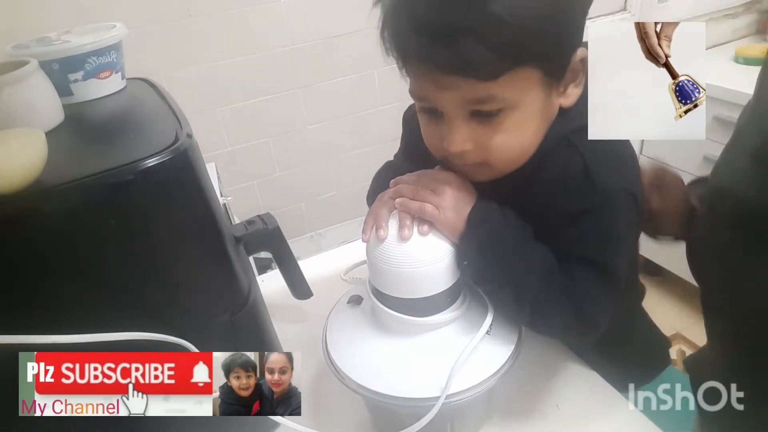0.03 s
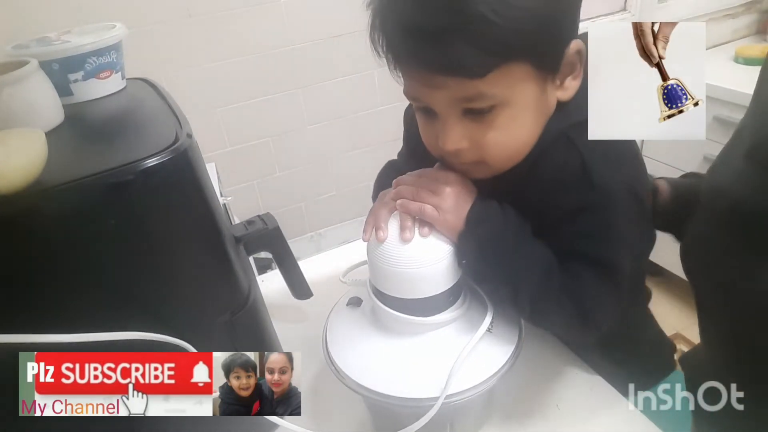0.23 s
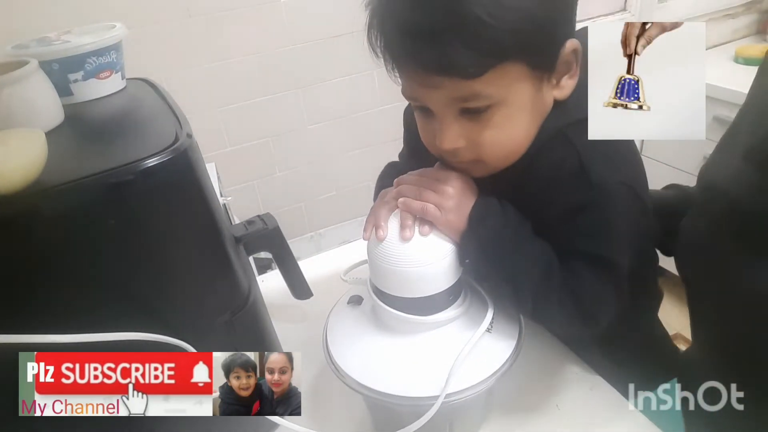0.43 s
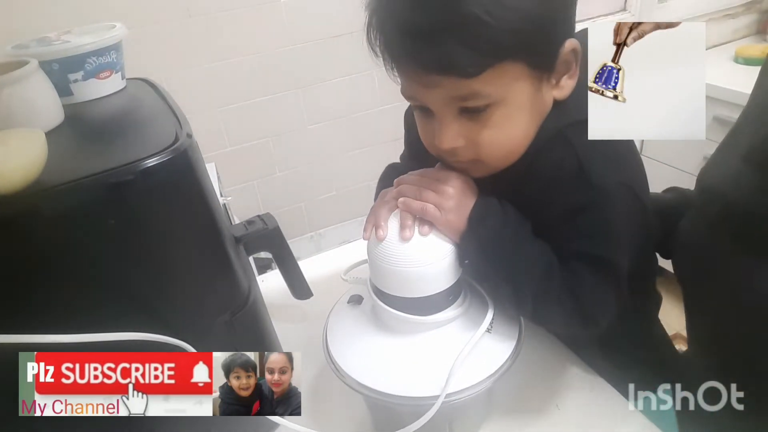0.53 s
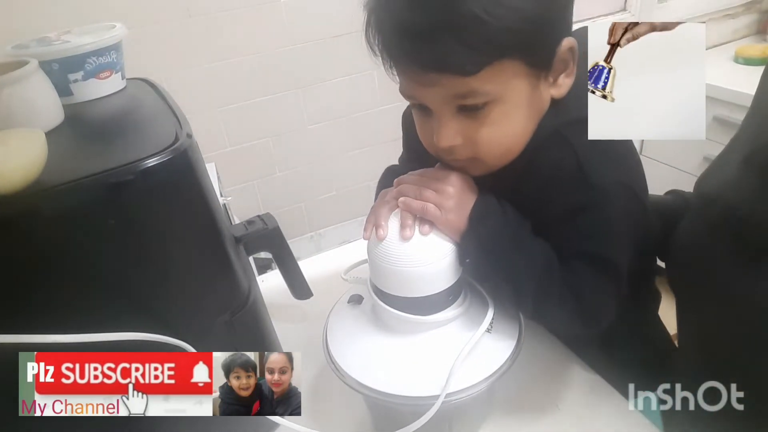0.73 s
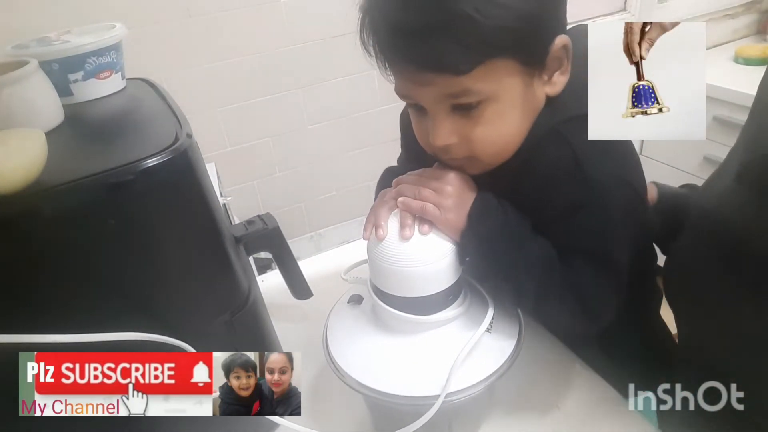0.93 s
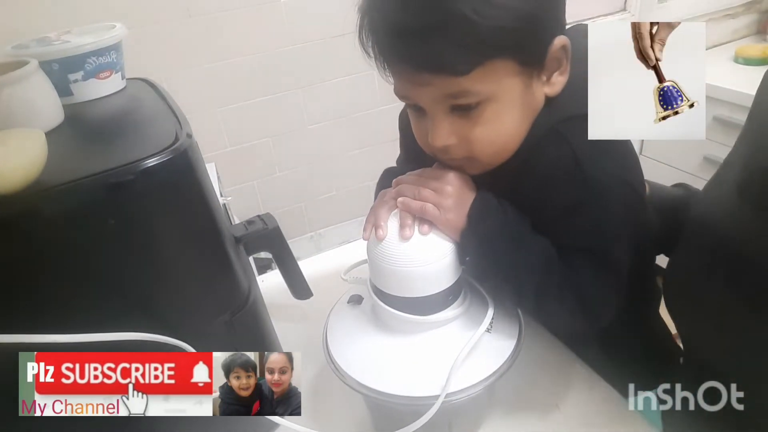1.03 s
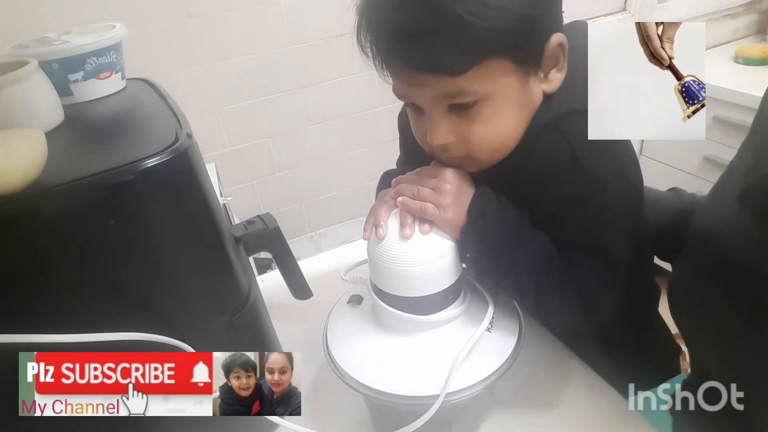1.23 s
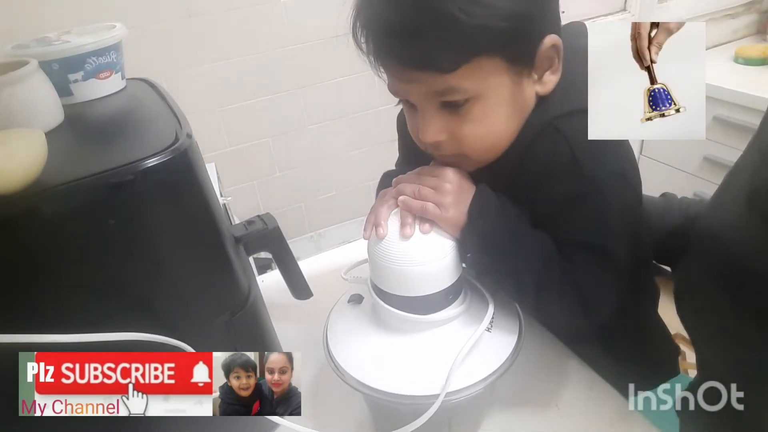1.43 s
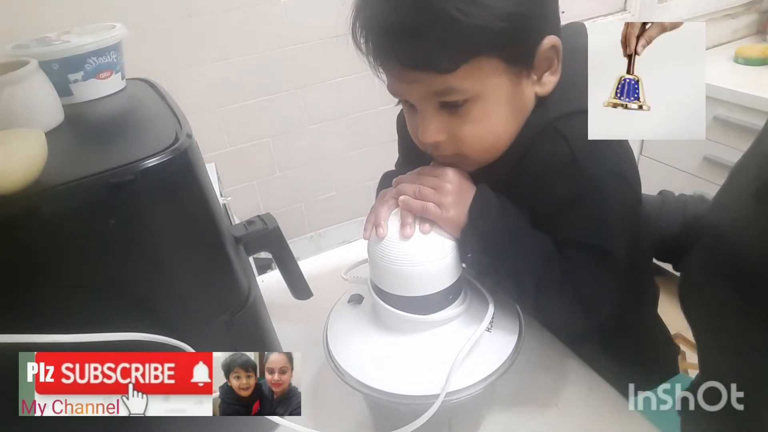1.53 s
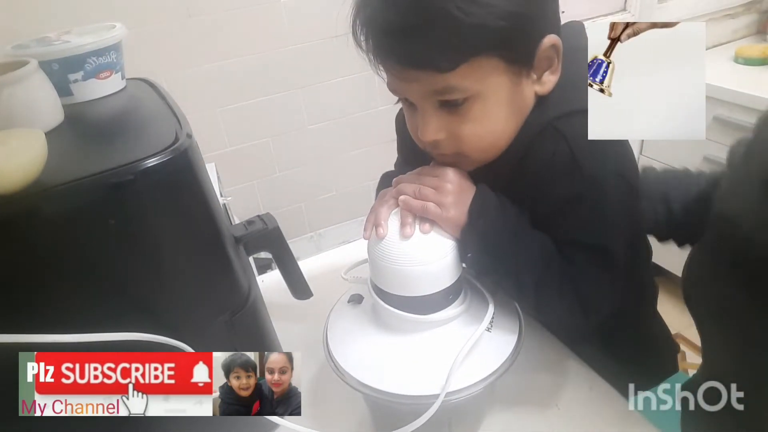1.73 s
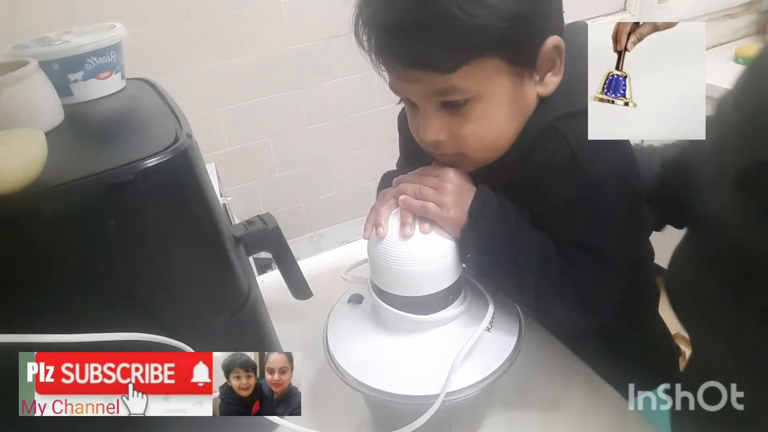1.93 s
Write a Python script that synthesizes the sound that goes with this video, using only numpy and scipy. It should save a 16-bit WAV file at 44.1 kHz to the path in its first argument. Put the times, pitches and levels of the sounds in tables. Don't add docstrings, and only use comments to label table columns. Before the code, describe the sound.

An electric chopper roars in a kitchen, hard spices rattling and cracking against its plastic bowl.

```python
import sys
import numpy as np
from scipy import signal
from scipy.fft import rfft, irfft
from scipy.io import wavfile
from scipy.ndimage import uniform_filter1d

SR = 44100
rng = np.random.default_rng(int(sys.argv[2]) if len(sys.argv) > 2 else 0)


def unload_audio(sound):
    columns = np.transpose(np.atleast_2d(sound))
    steps = np.round(np.clip(columns, -1, 1) * 32767)
    wavfile.write(sys.argv[1], SR, steps.astype(np.int16))


def gain_from_decibels(decibels):
    exponent = np.asarray(decibels, float) / 20
    return 10 ** exponent


N = 88200

# (frequency [Hz], density [dB per Hz])
HUSH_SPECTRUM = [(24, -24), (40, 0), (287, -24), (360, -16), (977, -33), (9000, -25), (11700, -62),
                 (19800, -120)]
# (time [s], drone pitch [Hz], drone level [dB], rumble level [dB])
MOTOR_COURSE = [(0.207, 332.3, -30, -26), (0.391, 352, -32, -32), (0.435, 341.6, -22, -22),
                (0.495, 331.7, -27, -26.5), (0.671, 335.4, -20.5, -24), (0.691, 340.4, -23.5, -25),
                (0.935, 335, -25, -28), (1.029, 331.9, -34, -26.5), (1.085, 324.9, -28, -16),
                (1.194, 336.8, -24.5, -37), (1.295, 339.1, -19, -18), (1.355, 354, -25.5, -40),
                (1.385, 349.8, -22.5, -26.5), (1.684, 336.4, -29, -28), (1.893, 335.4, -37, -39.5),
                (2.0, 352, -71, -65)]
# (frequency [Hz], width [Hz], level [dB])
BOWL_MODES = [(81, 44, -8.5), (108, 32.5, -4.5), (162.3, 54, 0), (191.6, 27.6, -5.5), (236, 130, -12.5)]
# (time [s], peak [dB], ring [Hz], t60 [s])
THUD_EVENTS = [(0.209, -17, 204, .03), (0.22, -4, 210, 0.019), (0.229, -21, 108, 0.07),
               (.27, -10, 332, 0.044), (0.333, -27, 186, .06), (.402, -10, 350, .06),
               (0.422, -9, 178, 0.13), (0.435, -11, 188, .06), (.47, -17, 172, 0.067),
               (0.65, -5, 325, 0.044), (0.673, -5, 317, .04), (0.778, -25, 168, 0.12),
               (0.865, -6, 317, 0.069), (1.0682, -6.5, 161, 0.03), (1.081, -3, 165, 0.036),
               (1.134, -8, 316, 0.078), (1.219, -7, 347, 0.11), (1.258, -7, 318, 0.058),
               (1.288, 0.5, 337, 0.051), (1.305, -6.5, 360, 0.048), (1.322, 1.5, 360, 0.027),
               (1.309, -11, 185, 0.063), (1.357, -2, 370, 0.038), (1.469, -12, 320, 0.03),
               (1.648, -11, 338.6, 0.13)]
# (time [s], peak [dB], ring [Hz], t60 [s])
CRACK_EVENTS = [(0.2339, -1, 2460, 0.025), (0.293, -6, 2360, 0.028), (0.3709, 6.5, 6400, 0.02),
                (0.3825, 0, 6640, 0.0058), (0.4094, -23, 3680, 0.032), (0.4248, 1, 4260, 0.02),
                (0.4406, 3, 4530, 0.02), (0.612, -11, 3570, 0.02), (0.6447, -2, 3900, 0.021),
                (0.6740, 7.5, 4830, 0.013), (0.7305, 2.5, 5400, 0.021), (0.769, 1, 3800, 0.035),
                (0.8624, -1, 2510, 0.039), (1.0806, -2.5, 2200, 0.06), (1.1314, -7, 3550, 0.051),
                (1.1453, 6.5, 5200, 0.02), (1.1954, -29, 3540, 0.022), (1.2558, -3, 3630, 0.058),
                (1.2681, 3, 3500, 0.02), (1.2869, 1.5, 1630, 0.017), (1.321, -2, 3600, 0.054),
                (1.3564, -6, 1560, 0.011), (1.453, 3, 3850, 0.024), (1.6988, -20, 1705, 0.02),
                (1.8205, -30, 2061, 0.019), (1.899, -26, 6000, 0.023), (0.2001, -18.5, 3560, 0.016),
                (0.697, 0, 6500, .015), (0.8296, -4.5, 3370, 0.037), (1.306, -9, 3000, 0.019),
                (1.447, -7.5, 7350, 0.013), (1.488, -7, 3700, 0.017), (1.527, -8, 1980, .015),
                (1.81, -16, 6200, .015), (.681, 2, 4800, .015), (.746, -3, 3800, 0.023),
                (.79, -7, 4500, .02)]
# (frequency [Hz], width [Hz], level [dB])
WALL_MODES = [(666, 54, -1.5), (970, 38, 5), (1161, 130, 3), (1401, 35, 10.5), (1665, 26, 1.5),
              (2410, 180, -5.5), (3600, 267, 0), (4820, 105, -5), (6730, 1800, -7)]
# (frequency [Hz], density [dB per Hz])
RATTLE_SPECTRUM = [(300, -41), (480, -9), (1400, -5), (4200, -5.5), (7800, -8), (10800, -10), (13000, -11),
                   (15600, -13.5)]
# (time [s], rattle level between surges [dB], extra weight of heavy pieces [dB])
LOAD_COURSE = [(0.208, -31, 5), (0.249, -23, -3.5), (.34, -24.5, 2.5), (.39, -18, -5.5), (.6, -19.5, -4),
               (.8, -19.5, -1.5), (1.05, -24, 2.5), (1.2, -17, -4), (1.42, -23.5, 2), (1.58, -26, 2.5),
               (1.8, -37, 4.5), (1.91, -49, 2.5), (2.0, -69.5, 4)]
# (time [s], hold [s], gain [dB], extra for heavy pieces [dB])
SURGE_EVENTS = [(0.217, 0.015, 4.5, 5), (0.398, .045, 4.5, 3), (0.49, 0.03, 3, 1), (0.518, 0.058, 2.5, 0.5),
                (0.609, 0.078, 5, 1.5), (0.704, 0.038, 3, -3), (0.758, 0.021, 1.5, 1.5),
                (0.856, 0.032, 2, 3.5), (.92, 0.032, 2.5, -3.5), (1.065, 0.046, 3.5, -0.5),
                (1.107, 0.012, 2, -4), (1.249, 0.065, 2, 3.5), (1.336, 0.02, 2, 3.5),
                (1.432, 0.012, 1.5, 2.5), (1.489, 0.038, 2, 0), (1.778, 0.022, 1.5, 1.5)]
# (frequency [Hz], correlation [0-1])
PORT_LIKENESS = [(40, .75), (130, .97), (290, .85), (640, .7), (1200, .45), (2400, .4), (5000, .25),
                 (15000, .1)]
# (frequency [Hz], left minus right [dB])
LEFT_COLOUR = [(60, 0), (200, 1.5), (380, 2), (1300, 1.5), (3000, 3), (5800, -3), (8600, 4.5), (15000, 9)]
# (frequency [Hz], left lead [rad])
LEFT_PHASE = [(60, 0), (800, .5), (1250, 3), (2330, 7.5), (3500, 14), (15000, 14.5)]
# (frequency [Hz], half width [Hz], level [dB])
PORT_DIPS = [(4220, 74, -7.5), (5410, 110, -3.5), (8790, 214, -12.5), (9560, 490, -10)]

HUSH_DB, STIR_DB, STIR_S, STIR_RISE_S = -78.5, 12, 0.15, 0.033
START_S, START_RISE_S = 0.197, 0.011
KNOCKS_PER_S, KNOCK_SPREAD_DB, KNOCK_S = 230, 4, 0.023
FLUTTER_HZ, DRONE_STEADY, DRONE_SKIRT_DB, DRONE_SIDE_DB, DRONE_WANDER = 41, 0.46, -1.5, -8, 0.03
SHAFT_DB, SHAFT_WALK_DB = -12, 4
THUD_DB, THUD_BOWL_DB = -9.5, -6
COUNTER_HZ, COUNTER_WIDTH_HZ, COUNTER_DB = 104, 4, 13
CRACK_DB, CRACK_NOISE_DB, CRACK_WALL_DB = -3.5, -1.5, -2.5
CRACK_RISE_S, CRACK_WIDTH = 0.00051, 0.17
SURGE_ATTACK_S, SURGE_RELEASE_S = 0.019, 0.024
TICKS_PER_S, TICK_SPREAD_DB, TICK_S, BED_DB = 2500, 4.5, 0.0016, 1
WALL_DB, WALL_PER_SURGE, WALL_WALK_DB = -11, 1.1, 2.0
FLICKER_DB, PATCH_DB = 0.6, 1.0
HEAVY_BELOW_HZ = 3340
BODY_DB, DRONE_DB, RUMBLE_DB = 4.0, -2.0, -3.0
BASS_CUT_HZ, TOP_HZ, CLIP = 74, 15730, 1.06


def level(x, db):
    return x * gain_from_decibels(db) / np.sqrt(np.mean(x ** 2))


def at(table, hz):
    table = np.array(table, float)
    return np.interp(np.log(hz + 1), np.log(table[:, 0] + 1), table[:, 1])


def colour(x, gain):
    return irfft(rfft(x) * gain(np.arange(N // 2 + 1) * SR / N), N)


def ring(x, hz, width_hz):
    return signal.lfilter(*signal.iirpeak(hz, hz / width_hz, SR), x)


def smear(x, decay_s):
    return signal.lfilter([1], [1, -np.exp(-1 / (decay_s * SR))], x)


def decay(t, t60_s):
    return np.exp(-np.log(1000) * t / t60_s)


def walk(rate_hz):
    k = int(SR / rate_hz)
    steps = np.repeat(rng.standard_normal(N // 100)[:N // k + 1], k)
    slewed = uniform_filter1d(uniform_filter1d(steps, k), k)
    return level(slewed[:N], 0)


def hits(per_s, spread_db):
    chance, strength = rng.random((2, N))
    peak_db = np.minimum(-spread_db * np.log(strength + 1e-9), 18)
    return (chance < per_s / SR) * gain_from_decibels(peak_db)


def pair():
    def likeness(hz):
        return np.clip(at(PORT_LIKENESS, hz), -0.9, 0.99)

    mid, side = rng.standard_normal((2, N))
    mid = colour(mid, lambda hz: np.sqrt((1 + likeness(hz)) / 2))
    side = colour(side, lambda hz: np.sqrt((1 - likeness(hz)) / 2))
    return np.array([mid + side, mid - side])


def hush(t):
    floor = level(colour(pair(), lambda hz: gain_from_decibels(at(HUSH_SPECTRUM, hz))), HUSH_DB)
    return floor * gain_from_decibels(STIR_DB * np.clip((t - STIR_S) / STIR_RISE_S, 0, 1))


def bowl(drive):
    return sum(gain_from_decibels(db) * ring(ring(drive, hz, 0.91 * width), hz, 0.91 * width)
               for hz, width, db in BOWL_MODES)


def rumble():
    noise = pair()
    knocks = smear(hits(KNOCKS_PER_S, KNOCK_SPREAD_DB), KNOCK_S)
    return level(bowl(noise * knocks), 0)


def drone(hz):
    def slow():
        noise = rng.standard_normal(N) + 1j * rng.standard_normal(N)
        return signal.lfilter(*signal.butter(2, FLUTTER_HZ, fs=SR), noise)

    def tone(steady):
        flutter = level(slow().real, -9.5) + 1j * level(slow().imag, 1.4)
        return level(((steady + flutter) * turn).real, 0)

    angle = 2 * np.pi * np.cumsum(hz * (1 + DRONE_WANDER * walk(24.71))) / SR
    turn = np.exp(1j * angle)
    shaft = gain_from_decibels(SHAFT_DB + SHAFT_WALK_DB * walk(20.26)) * np.sin(angle / 2)
    mid = tone(DRONE_STEADY)
    side = gain_from_decibels(DRONE_SIDE_DB) * tone(0) * np.array([[1], [-1]])
    skirt = level(ring(pair(), 375, 200), DRONE_SKIRT_DB)
    return mid + side + skirt + shaft


def thuds():
    size = 4000
    out, t = np.zeros(N + size), np.arange(size) / SR
    for s, db, hz, t60 in THUD_EVENTS:
        boom = np.sin(2 * np.pi * hz * t) * decay(t, np.clip(t60, 0.01, 0.15))
        i = int(s * SR)
        out[i:i + size] += gain_from_decibels(db + THUD_DB) * boom / boom.max()
    booms = out[:N]
    counter = gain_from_decibels(COUNTER_DB) * ring(booms, COUNTER_HZ, COUNTER_WIDTH_HZ)
    return booms + gain_from_decibels(THUD_BOWL_DB) * bowl(booms) * 3.1 + counter


def wall_ring(drive, walk_db=0):
    out = 0
    for hz, width, db in WALL_MODES:
        gain = gain_from_decibels(db + walk_db * walk(16.1)) if walk_db else gain_from_decibels(db)
        out = out + gain * ring(drive, hz, width)
    return out


def cracks():
    size = 3000
    out, t = np.zeros((2, N + size)), np.arange(size) / SR
    for s, db, hz, t60 in CRACK_EVENTS:
        noise = rng.standard_normal((3, size))
        noise = noise[:2] + 0.7 * noise[2]
        env = (1 - np.exp(-t / CRACK_RISE_S)) * decay(t, np.clip(t60, 0.005, 0.07))
        width = hz * CRACK_WIDTH
        burst = level(env * ring(ring(noise, hz, width), hz, width), 0)
        burst += level(env * ring(noise, 6100, 11000), CRACK_NOISE_DB)
        burst += level(wall_ring(noise * env), CRACK_WALL_DB)
        i = int(s * SR)
        out[:, i:i + size] += burst * gain_from_decibels(db + CRACK_DB) / np.abs(burst).max()
    return out[:, :N]


def surges(t):
    s, hold, db, heavy_db = np.array(SURGE_EVENTS).T[:, :, None]
    rise = np.clip((t - s) / SURGE_ATTACK_S, 0, 1)
    shape = rise * np.exp(-np.maximum(t - s - hold, 0) / SURGE_RELEASE_S)
    return (db * shape).sum(axis=0), (heavy_db * shape).sum(axis=0)


def rattle(surge_db):
    def spectrum(hz):
        bass_cut = np.sqrt(1 + (450 / (hz + 1)) ** 6)
        return gain_from_decibels(at(RATTLE_SPECTRUM, hz)) * (hz > 0) / bass_cut

    power = smear(hits(TICKS_PER_S, TICK_SPREAD_DB) ** 2, TICK_S)
    ticks = level(power ** 0.5, 0)
    drive = pair() * np.sqrt(ticks ** 2 + gain_from_decibels(BED_DB) ** 2)
    wall = level(wall_ring(drive, WALL_WALK_DB), WALL_DB)
    patches = sum(gain_from_decibels(PATCH_DB * walk(16.74)) * ring(drive, hz, hz * 0.43)
                  for hz in 500 * 2.0 ** np.arange(0, 5.1, 0.5))
    plain = level(colour(patches, spectrum), 0)
    mix = level(plain + wall * gain_from_decibels(WALL_PER_SURGE * surge_db), 0)
    return mix * gain_from_decibels(FLICKER_DB * walk(35.23))


def scene():
    t, load, motor = np.arange(N) / SR, np.array(LOAD_COURSE), np.array(MOTOR_COURSE)
    on = np.clip((t - START_S) / START_RISE_S, 0, 1) ** 2
    hz, drone_db, rumble_db = (np.interp(t, motor[:, 0], v) for v in motor.T[1:])
    surge_db, surge_heavy_db = surges(t)
    db = np.interp(t, load[:, 0], load[:, 1]) + surge_db
    heavy_db = np.interp(t, load[:, 0], load[:, 2]) + surge_heavy_db
    pieces = rattle(surge_db)
    heavy = colour(pieces, lambda f: 1 / (1 + (f / HEAVY_BELOW_HZ) ** 4))
    body = gain_from_decibels(db + BODY_DB) * (pieces + (gain_from_decibels(heavy_db) - 1) * heavy)
    body += gain_from_decibels(drone_db + DRONE_DB) * drone(hz)
    body += gain_from_decibels(rumble_db + RUMBLE_DB) * rumble()
    floor = hush(t)
    return on * body + cracks() + thuds() + floor


def roll_off(x):
    return signal.sosfilt(signal.butter(12, 15690, fs=SR, output="sos"), x)


def record(dry):
    def port(hz, sign):
        dips = gain_from_decibels(sum(db / (1 + ((hz - f) / w) ** 2) for f, w, db in PORT_DIPS))
        tilt = gain_from_decibels(sign * at(LEFT_COLOUR, hz) / 2)
        return dips * tilt * np.exp(0.5j * sign * at(LEFT_PHASE, hz))

    x = signal.sosfilt(signal.butter(4, BASS_CUT_HZ, "high", fs=SR, output="sos"), dry)
    left = colour(x[0], lambda hz: port(hz, 1))
    right = colour(x[1], lambda hz: port(hz, -1))
    top_cut = signal.ellip(12, 0.2, 80, TOP_HZ, fs=SR, output="sos")
    x = signal.sosfilt(top_cut, np.array([left, right]))
    return roll_off(np.clip(x, -CLIP, CLIP))


dry = scene()
out = record(dry)
unload_audio(out)
```